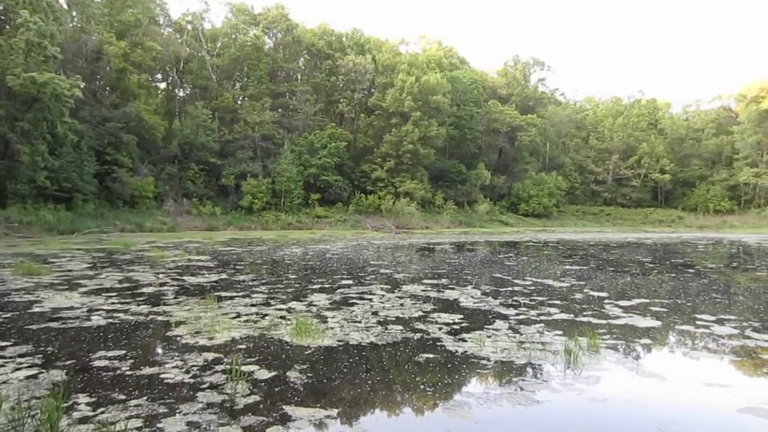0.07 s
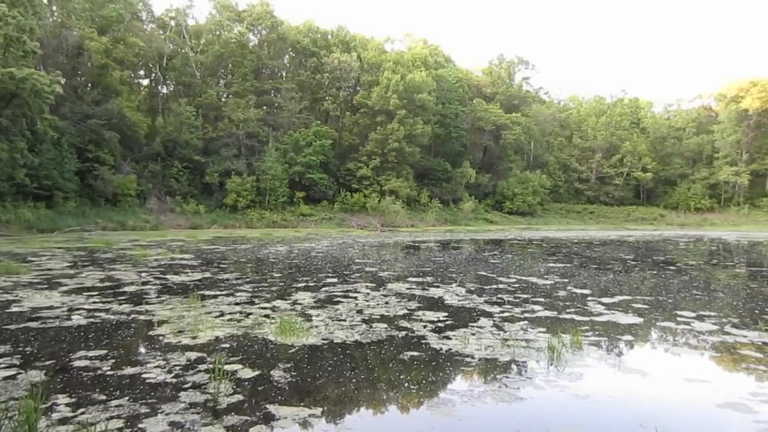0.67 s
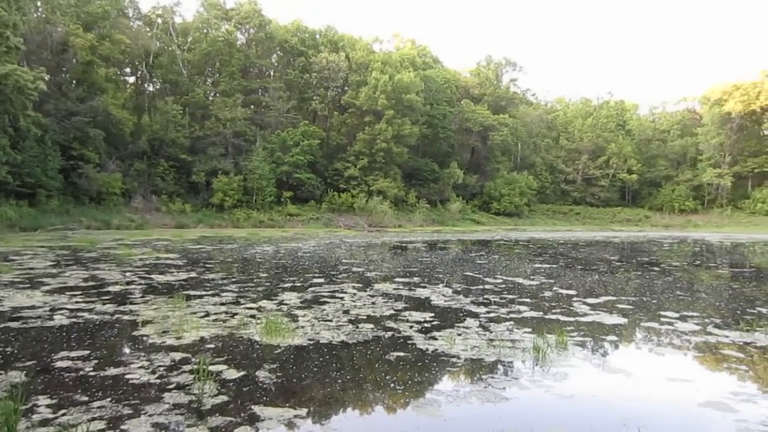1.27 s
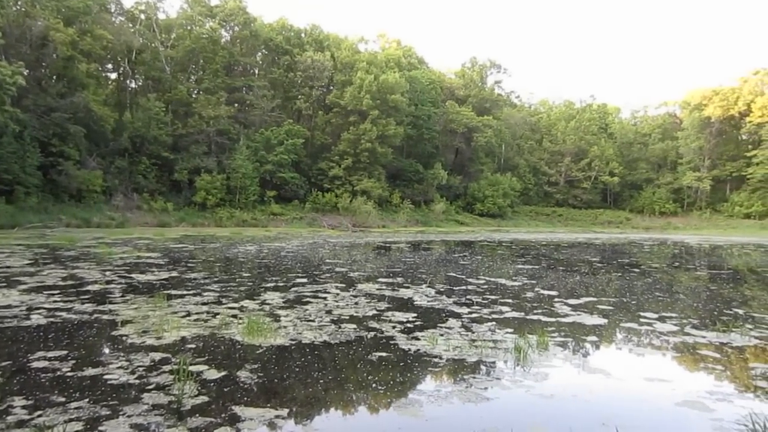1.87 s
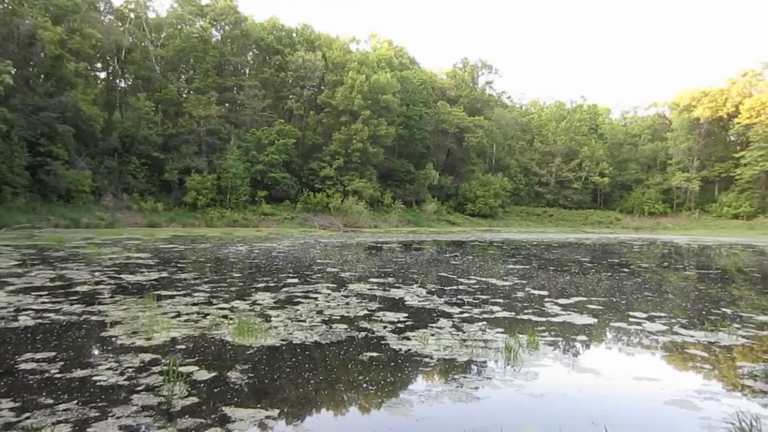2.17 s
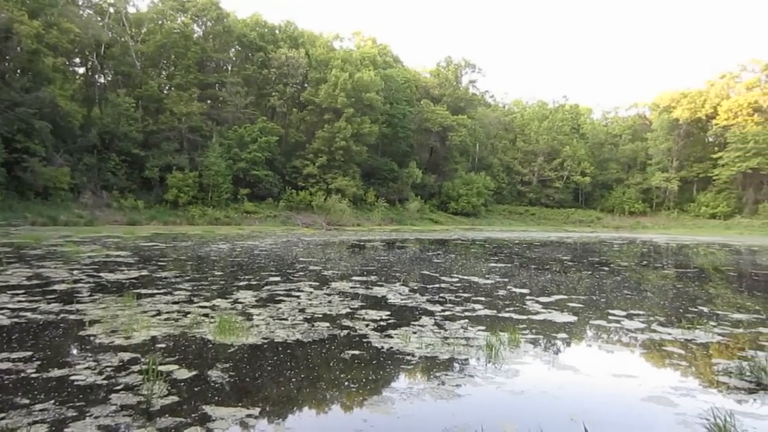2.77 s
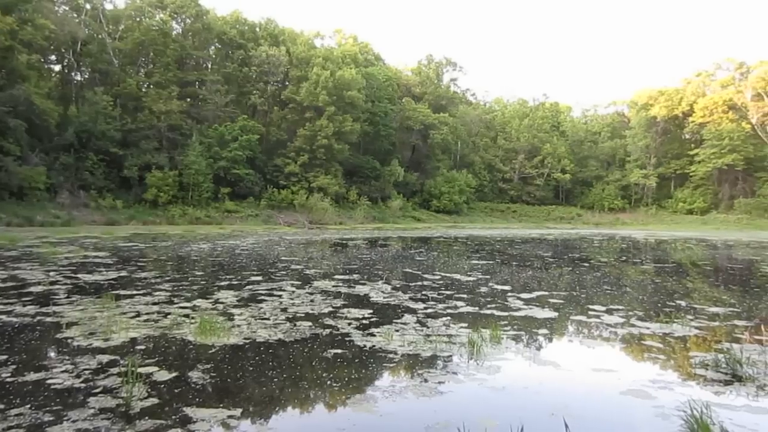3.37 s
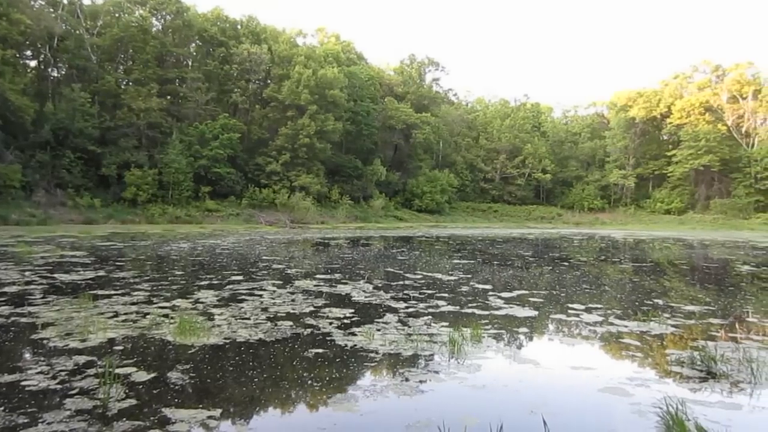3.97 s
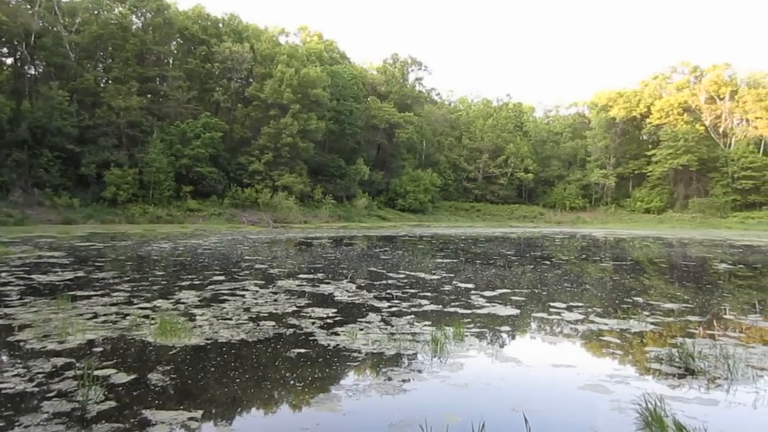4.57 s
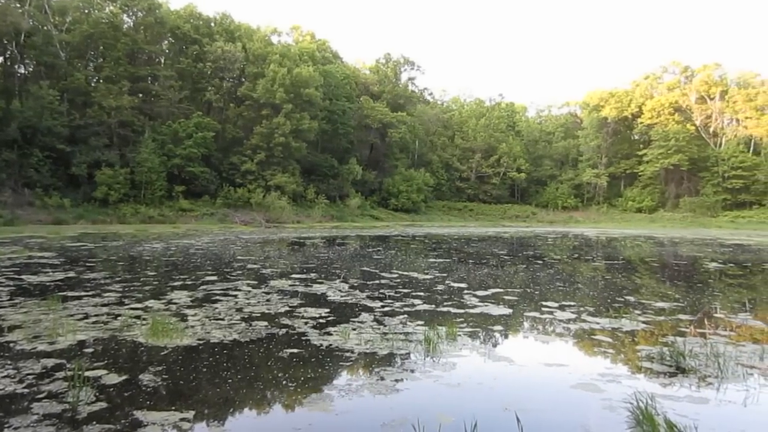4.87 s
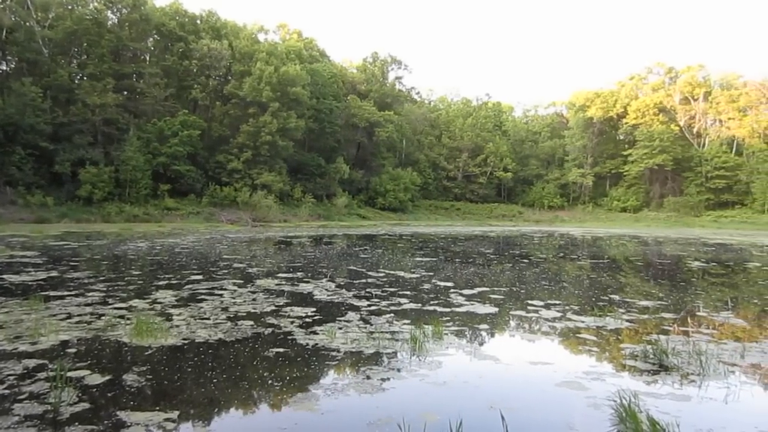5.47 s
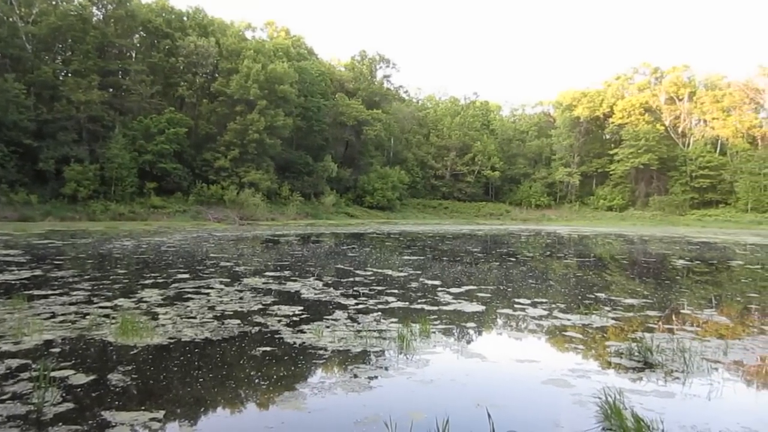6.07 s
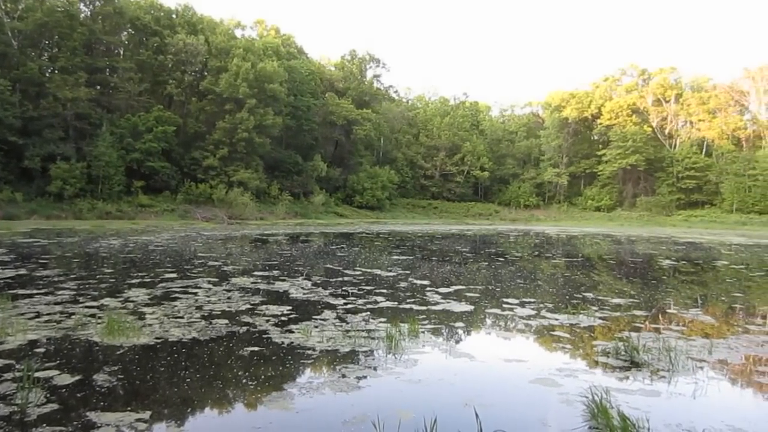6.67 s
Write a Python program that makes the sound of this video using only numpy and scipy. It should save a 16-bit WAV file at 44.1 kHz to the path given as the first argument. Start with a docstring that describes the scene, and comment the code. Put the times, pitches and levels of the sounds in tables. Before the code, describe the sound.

Treefrogs trill around a woodland pond, over a soft steady hiss and a gently swelling low rumble. Each trill is a high, rapid train of pulses lasting under a second or so, placed somewhat left, with a light echo and a reverberant tail from the trees. Three loud trills overlap from the start to 1.1 seconds. A softer group follows from 1.7 to 2.9, then more overlap from 3 to 5, and a last group runs from 5.6 to 6.6. Smaller frogs add quieter, higher creaks, runs of ringing clicks that slow and rise slightly in pitch, at about 1.3 to 1.7 seconds, faintly at 3.1, again from 4.9 to 5.7, and briefly at the end. A distant bird, barely audible, chips at 1.3 and 2.8 seconds and gives a few tiny whistles and a chip between 5.6 and 6.7.

```python
"""Treefrogs round a woodland pond

Treefrogs trill in overlapping bouts: each pulse is a rising harmonic sweep of the vocal cords,
filtered by the vocal sac and head. Smaller frogs creak in runs of ringing clicks, and a far bird
chips and whistles. The tree line returns an echo and the trunks scatter a long reverberant tail.
A soft hiss and a low rumble lie under it all."""
import sys
import numpy as np
from scipy import signal
from scipy.fft import rfft, irfft
from scipy.io import wavfile
from scipy.ndimage import uniform_filter1d

SR = 44100
rng = np.random.default_rng(int(sys.argv[2]) if len(sys.argv) > 2 else 0)


def unload_wav(signal):
    """Save mono or channel-first audio to the path in sys.argv[1] as 16-bit WAV at rate SR, clipped to [-1, 1]."""
    wavfile.write(
        sys.argv[1],
        SR,
        np.round(np.clip(np.atleast_2d(signal).T, -1, 1) * 32767).astype(np.int16),
    )


N = 296352

# Background spectrum, from low rumble to soft hiss; the treble also dips at 12 kHz: frequency_hz,
# relative_density_db
BACKGROUND_SPECTRUM = [(22, -20), (62, 1), (100, -3), (140, -9), (210, -4.5), (450, -10.5), (850, -16.5),
                       (1300, -13), (2600, -20), (3600, -27.5), (6500, -35), (10000, -44.5), (12000, -61.5),
                       (14500, -50.5)]
# Stereo field of the background: frequency_hz, correlation (-1 to 1), left_minus_right_db
BACKGROUND_STEREO = [(60, 0.78, 4.5), (130, 0.33, 1.5), (402, -0.52, 0.3), (1320, -0.091, 0),
                     (4000, -0.077, 0), (7900, -0.034, 1.5), (13000, 0.18, -2)]
# Slow swell of the rumble: time_s, gain_db
RUMBLE_SWELL = [(0, 6.5), (.8, 3.5), (1.2, 0.5), (2.799, -1.5), (3.7, 2.5), (4.3, -2), (5.499, -1.5),
                (6.7, 2)]
# Treefrog voices, with harmonics relative to the second and all levels before the throat's resonances:
# level_db, pitch_hz, rise_hz, pulse_s, swell_s, first_db, third_db, fourth_db, left_minus_right_db,
# scatter_db
TREEFROG_VOICES = [ (-24.5, 1295, 263, .012, 0.025, -4.5, -23, -30.5, 7.3, -9),
                   (-25, 1410, 330, .0085, 0.079, -10.5, -25, -39.5, 4, -8.5),
                   (-26.5, 1340, 270, .008, 0.038, -7, -22.5, -37, 4.6, -3),
                   (-34, 1115, 310, 0.022, 0.16, .5, -20, -36, 5.4, -9),
                   (-45, 1215, 425, .012, .16, -4.5, -18.5, -36.5, 1.3, -3),
                   (-39, 1220, 403, .01, 0.012, -5, -23.5, -41, 1, -1.5),
                   (-30, 1320, 248, .0075, .036, -8.5, -29.5, -47, 6.8, -1),
                   (-36.5, 1280, 236, .0095, 0.025, -0.5, -17.5, -43, 2.5, -3.5),
                   (-32, 1380, 310, .007, 0.49, -12.5, -35, -51, 2.1, -5.5),
                   (-27.5, 1210, 320, .019, 0.065, -9.5, -32.5, -46, 7.4, -2.5),
                   (-32.5, 1255, 334, .008, 0.04, -5.5, -29, -45, 1.9, -5.5),
                   (-30, 1320, 243, 0.0083, 0.15, -4.5, -17, -36, 7, -5.5),
                   (-31.5, 1340, 357, .0087, 0.019, -5.5, -27, -49.5, 6.4, -3.5),
                   (-39, 1190, 280, .01, 0.19, -13, -29, -43, 1.5, -6)]
# One trill per voice, slowing as the breath runs out: first_pulse_s, last_pulse_s, gap_count, slowing
TREEFROG_TRILLS = [(.0517, .804, 37, .018), (.239, 1.135, 44, .025), (.2467, .999, 37, .018),
                   (1.727, 2.546, 13, .01), (1.945, 2.943, 32, .01), (1.965, 2.59, 26, .02),
                   (3.002, 3.993, 45, .017), (2.975, 3.965, 47, .02), (3.575, 4.428, 42, .026),
                   (4.243, 4.925, 13, .034), (4.315, 5.041, 35, .012), (5.634, 6.413, 40, .023),
                   (5.737, 6.423, 36, .03), (6.05, 6.622, 24, .01)]
# Resonances of the vocal sac and head: frequency_hz, gain_db
THROAT_RESPONSE = [(880, -16), (1110, 2.5), (1370, 0), (1580, 3.5), (1720, 4.5), (2100, 0), (2330, -3),
                   (2590, 1.5), (2850, -3), (3500, -2), (3850, 0.5), (4300, -7), (4700, -3.5), (5100, -8.5),
                   (5900, -7.5), (6450, -3), (7200, -9), (7520, 2.5), (7800, -18.5)]
# Creaks of the small frogs: start_s, length_s, first_gap_s, longest_gap_s, loudest_s, relative_peak_db,
# fade_db_per_s, second_harmonic_hz (at the start)
CREAK_RUNS = [(1.262, .33, .0238, 0.045, 1.53, -32.5, 57, 3510),
              (1.3565, .38, .035, 0.057, 1.66, -41.5, 60, 3770),
              (1.504, .24, .0515, 0.051, 1.62, -45, 50, 4044),
              (3.059, .42, .0352, 0.063, 3.23, -42, 34, 3900),
              (4.9147, .41, .0337, 0.06, 5.08, -41.5, 29, 3870),
              (5.159, .55, .026, .0468, 5.42, -32.5, 70, 3503),
              (5.376, .25, .053, 0.06, 5.45, -44, 42.5, 4020),
              (6.577, .13, .032, .046, 6.69, -48, 46, 3760)]
# The bird's chips: start_s, relative_level_db
BIRD_CHIPS = [(1.328, -56), (2.801, -60.5), (6.502, -57)]
# The two voices of every chip: delay_s, length_s, start_hz, middle_hz, end_hz, relative_level_db
CHIP_TONES = [(0, .03, 5600, 6580, 6830, -1), (.008, 0.02, 5390, 4930, 4460, -2)]
# The bird's whistles: start_s, length_s, start_hz, middle_hz, end_hz, relative_level_db
BIRD_WHISTLES = [(5.61, .017, 5200, 4500, 4160, -57), (6.37, .025, 5480, 5520, 5600, -57),
                 (6.585, 0.03, 4130, 5100, 6340, -58), (6.61, .034, 6400, 6100, 6300, -59.5),
                 (6.672, 0.041, 6300, 5440, 5300, -57)]

WOODS_T60_S, WOODS_BUILD_S, WOODS_CUTOFF_HZ = 1.47, 0.011, 5000
# A creak's level and pitch grow as the frog presses harder.
CREAK_SWELL_DB_PER_S, CREAK_CLIMB_FRACTION, CREAK_CLIMB_S = 43, 0.1, 0.27
SIDES = np.array([[1], [-1]])  # left, right


def undb(db):
    """Amplitude grows tenfold for every 20 decibels."""
    return 10 ** (np.asarray(db) / 20)


def add(out, start_s, sound):
    """Superposition: a short sound adds to those already in the track."""
    i = max(int(start_s * SR), 0)
    out[i:i + len(sound)] += sound[:max(N - i, 0)]


def flutter(rate_hz):
    """Two moving averages smooth random steps into a slow fluctuation with a spread near 1."""
    hold = int(SR / rate_hz)
    steps = np.repeat(rng.standard_normal(N // hold + 1), hold)
    return 1.3 * uniform_filter1d(uniform_filter1d(steps, hold), hold)[:N]


def background(base_db=-48, flutter_db=1.75, rumble_hz=150):
    """Partly correlated noise: a soft hiss whose low band, the rumble, is amplitude-modulated."""
    log_hz = np.log(np.maximum(np.arange(N // 2 + 1) * SR / N, 1))

    def curve(table, column):
        """Interpolation along a logarithmic frequency axis."""
        columns = np.transpose(table)
        return np.interp(log_hz, np.log(columns[0]), columns[column])

    correlation = curve(BACKGROUND_STEREO, 1)
    mid, side = rfft(rng.standard_normal((2, N))) * undb(curve(BACKGROUND_SPECTRUM, 1))
    spectrum = np.sqrt(1 + correlation) * mid + np.sqrt(1 - correlation) * side * SIDES
    spectrum *= undb(SIDES * curve(BACKGROUND_STEREO, 2) / 2)
    steady = irfft(spectrum, N)
    rumble = irfft(spectrum * np.exp(-((log_hz - np.log(rumble_hz)) / 0.69) ** 2), N)
    swell_db = np.interp(np.arange(N) / SR, *np.transpose(RUMBLE_SWELL))
    swell = undb(swell_db + flutter_db * flutter(rate_hz=12))
    return (steady + (swell - 1) * rumble) * undb(base_db) / np.std(steady)


def vocal_pulse(hz, rise_hz, length_s, harmonics_db, rasp=0.15, jitter=0.0097, short_s=0.011):
    """Source and filter: tightening vocal cords glide up, and the throat weights their harmonics."""
    u = np.linspace(-.5, .5, int(length_s * SR))
    knots_s = np.arange(20) * .0018
    roughness = rng.standard_normal((3, 20)) * min(1, short_s / length_s)  # long pulses are smoother
    shake, flap, wobble = (np.interp((u + .5) * length_s, knots_s, row) for row in roughness)
    glide = u - 0.2 * (length_s < short_s) * (u ** 2 - np.mean(u ** 2))  # short pulses level off
    pitch_hz = (hz + rise_hz * glide) * (1 + jitter * wobble)
    phase = 2 * np.pi * np.cumsum(pitch_hz) / SR
    envelope = np.maximum(np.cos(np.pi * u), 0) ** 0.63
    throat = np.transpose(THROAT_RESPONSE)
    fundamental, *upper = (undb(db + np.interp(k * pitch_hz, *throat)) * np.sin(k * phase)
                           for k, db in enumerate(harmonics_db, 1))
    sac = np.exp(1.32 * u) * (1 + 2 * rasp * flap) * fundamental  # the sac takes it up late
    overtones = np.exp(-0.53 * u) * (1 + rasp * shake) * sum(upper)
    return envelope * (sac + overtones)


def treefrog(voice, first_s, last_s, gap_count, slowing, waver=0.011, sharpen=0.0067):
    """A trill is a pulse train: it swells in, slows a little and creeps up in pitch."""
    db, hz, rise_hz, pulse_s, swell_s, first_db, third_db, fourth_db, pan_db, scatter_db = voice
    u = np.linspace(0, 1, gap_count + 1)
    times_s = first_s + (last_s - first_s) * (u + slowing * (u ** 3 - u))
    efforts = 1 - 0.82 * np.exp(-(times_s - first_s) / swell_s)
    harmonics_db = [first_db, 0, third_db, fourth_db, fourth_db - 4.5, fourth_db - 2.5]
    pitches_hz = hz * (1 + sharpen * (u - .5) + waver * rng.standard_normal(len(u)))
    out = np.zeros(N)
    for centre_s, effort, pitch_hz in zip(times_s, efforts, pitches_hz):
        pulse = vocal_pulse(pitch_hz, rise_hz, pulse_s, harmonics_db)
        add(out, centre_s - pulse_s / 2, effort * undb(db) * pulse)
    soft_sac = signal.butter(4, 8800, fs=SR, output="sos")  # rounds each pulse's edges
    return pond(signal.sosfilt(soft_sac, out), pan_db, scatter_db, echo_db=-16.5, echo_s=.203)


def scatter(envelope, correlation):
    """Diffuse reflection: dense arrivals merge into stereo noise of unit energy under an envelope."""
    mid, side = rng.standard_normal((2, len(envelope))) * envelope / np.sqrt(np.sum(envelope ** 2))
    return (np.sqrt(1 + correlation) * mid + np.sqrt(1 - correlation) * side * SIDES) / np.sqrt(2)


def pond(source, pan_db, scatter_db, echo_db, echo_s, smear_s=0.0019, reeds_db=-2, reeds_s=0.014):
    """Multipath propagation: direct sound plus reflections from the reeds, trunks and tree line."""
    t = np.arange(int(1.5 * SR)) / SR
    tail = (1 - np.exp(-t / WOODS_BUILD_S)) * np.exp(-np.log(1000) * t / WOODS_T60_S)
    trunks = scatter(tail, correlation=0.55)
    reeds = undb(reeds_db) * scatter(np.exp(-t / reeds_s), correlation=0.69)
    tree_line = scatter((t > echo_s) * np.exp(-abs(t - echo_s) / smear_s), correlation=1.0)
    response = undb(scatter_db) * (trunks + reeds) + undb(echo_db) * tree_line
    leaves = signal.butter(1, WOODS_CUTOFF_HZ, fs=SR)  # foliage absorbs the treble
    response = signal.lfilter(*leaves, response)
    right = np.roll(source, int(pan_db > 3.2))  # a caller well to the left arrives a sample late
    direct = np.array([source, right]) * undb(SIDES * pan_db / 2)
    return direct + signal.fftconvolve(source[None], response, axes=1)[:, :N]


def creak_clicks(start_s, length_s, first_gap_s, longest_gap_s, loudest_s, peak_db, fade_db_per_s, hz):
    """A click train whose gaps grow geometrically to a limit, as rows of start_s, level_db, pitch_hz."""
    gaps_s = np.minimum(first_gap_s * 1.1 ** np.arange(20), longest_gap_s)
    age_s = np.r_[0, np.cumsum(gaps_s)]
    uneven, waver = rng.standard_normal((len(age_s), 2)).T
    past_peak_s = start_s + age_s - loudest_s
    swell_db = np.minimum(CREAK_SWELL_DB_PER_S * past_peak_s, -fade_db_per_s * past_peak_s)
    levels_db = peak_db + swell_db + 1.04 * uneven
    climb = CREAK_CLIMB_FRACTION * np.minimum(age_s / CREAK_CLIMB_S, 1)
    pitches_hz = hz * (1 + climb + .008 * waver)
    return np.column_stack([start_s + age_s, levels_db, pitches_hz])[age_s < length_s]


def small_frogs(gain_db=0.7, rise_s=0.0016, droop_per_s=12, first_db=-18, third_db=-28):
    """Damped resonance: each click rings a tiny throat, mainly on harmonic two, and sags in pitch."""
    t = np.arange(SR // 50) / SR
    envelope = (t / rise_s * np.exp(1 - t / rise_s)) ** 2
    out = np.zeros(N)
    for start_s, db, hz in np.vstack([creak_clicks(*run) for run in CREAK_RUNS]):
        fundamental_hz = hz / 2 * (1 - droop_per_s * (t - rise_s))
        phase = 2 * np.pi * np.cumsum(fundamental_hz) / SR
        ring = undb(first_db) * np.sin(phase) + np.sin(2 * phase) + undb(third_db) * np.sin(3 * phase)
        add(out, start_s, undb(db + gain_db) * envelope * ring)
    return pond(out, pan_db=-2, scatter_db=-4.5, echo_db=-14, echo_s=0.36, smear_s=0.0011, reeds_db=1)


def whistle(length_s, start_hz, middle_hz, end_hz, db):
    """Frequency modulation: a pure tone glides along a parabola through three pitches."""
    u = np.linspace(0, 1, int(length_s * SR))
    arc = np.polyfit([0, .5, 1], [start_hz, middle_hz, end_hz], 2)
    phase = 2 * np.pi * np.cumsum(np.polyval(arc, u)) / SR
    return undb(db) * np.sqrt(4 * u * (1 - u)) * np.sin(phase)


def bird(gain_db=-5.5):
    """Biphonation: two gliding tones overlap in each chip, while a whistle is a single tone."""
    out = np.zeros(N)
    for start_s, db in BIRD_CHIPS:
        for delay_s, *tone in CHIP_TONES:
            add(out, start_s + delay_s, undb(db) * whistle(*tone))
    for start_s, *tone in BIRD_WHISTLES:
        add(out, start_s, whistle(*tone))
    out *= undb(gain_db)
    return pond(out, pan_db=-5, scatter_db=-3.5, echo_db=-11, echo_s=.2, reeds_db=7, reeds_s=0.027)


def scene():
    """Superposition: the sound pressures of the background and all the callers add."""
    chorus = (treefrog(voice, *trill) for voice, trill in zip(TREEFROG_VOICES, TREEFROG_TRILLS))
    return background() + sum(chorus) + small_frogs() + bird()


def record(dry):
    """Band limiting: a steep elliptic low-pass removes the treble above 15750 Hz."""
    return signal.sosfilt(signal.ellip(10, .1, 80, 15750, fs=SR, output="sos"), dry)


dry = scene()
out = record(dry)
unload_wav(out)
```